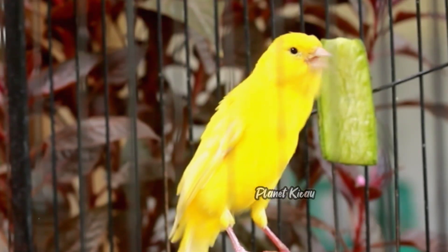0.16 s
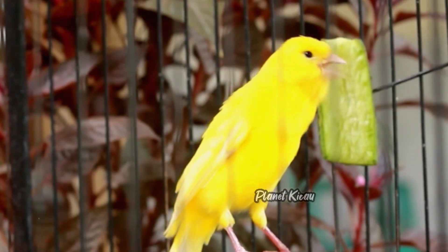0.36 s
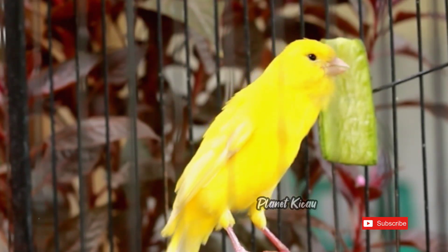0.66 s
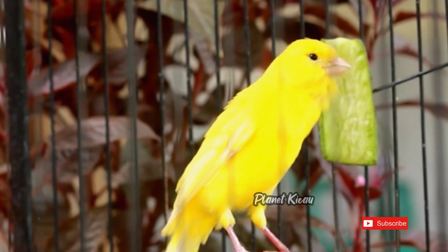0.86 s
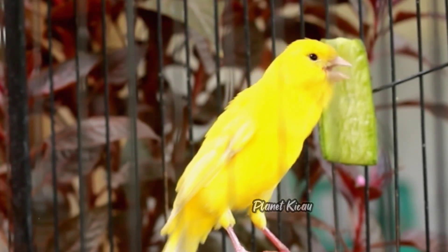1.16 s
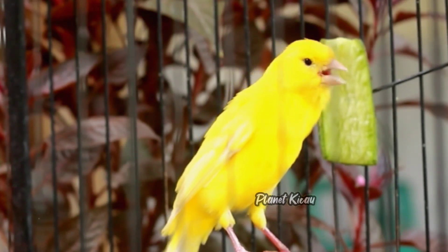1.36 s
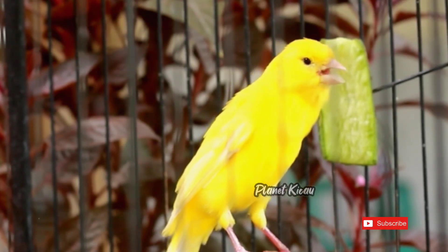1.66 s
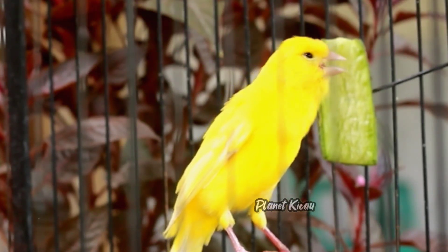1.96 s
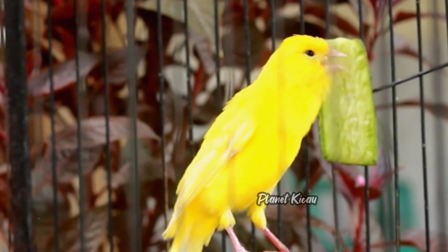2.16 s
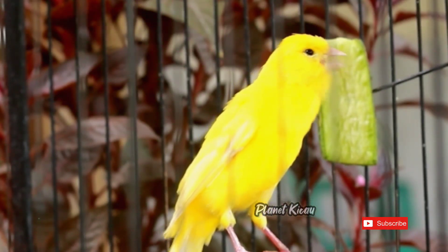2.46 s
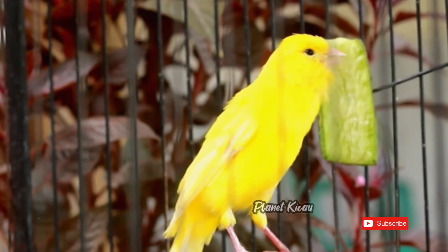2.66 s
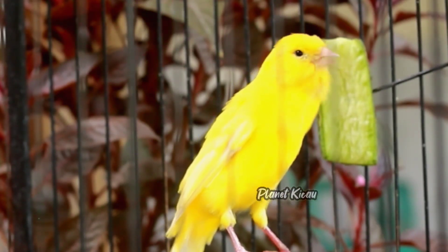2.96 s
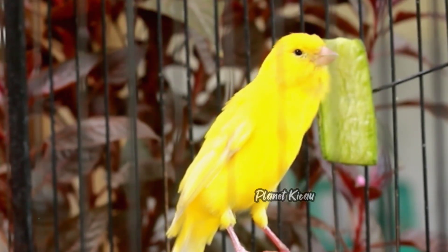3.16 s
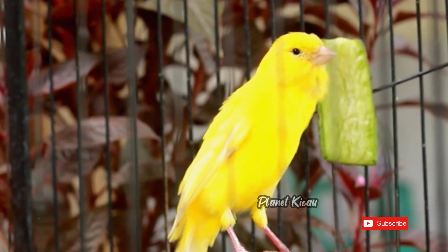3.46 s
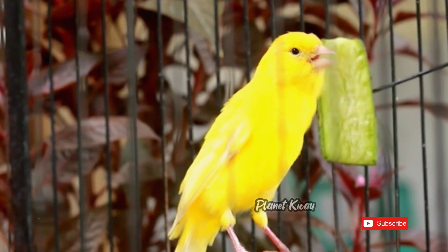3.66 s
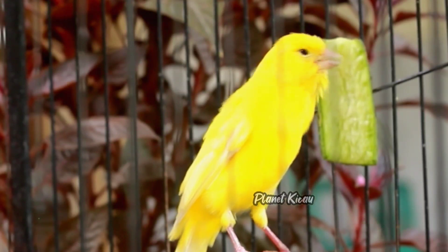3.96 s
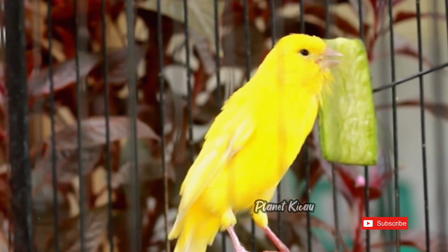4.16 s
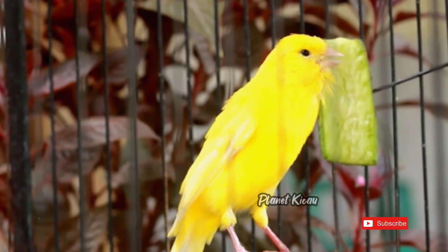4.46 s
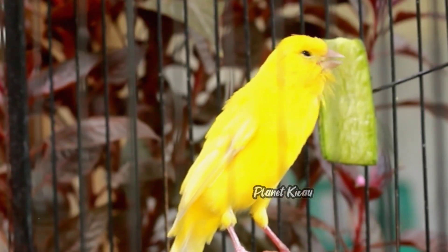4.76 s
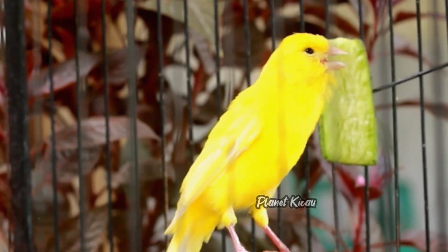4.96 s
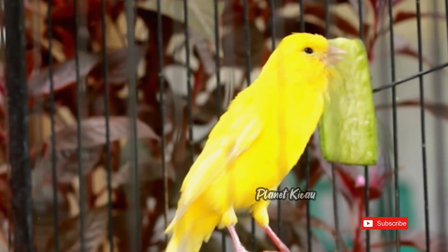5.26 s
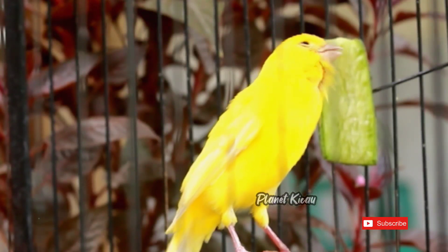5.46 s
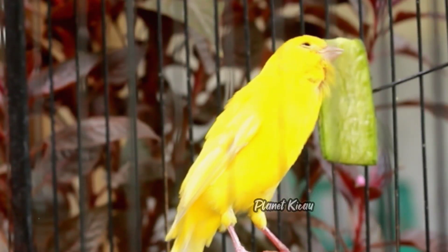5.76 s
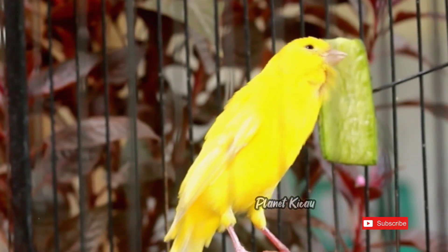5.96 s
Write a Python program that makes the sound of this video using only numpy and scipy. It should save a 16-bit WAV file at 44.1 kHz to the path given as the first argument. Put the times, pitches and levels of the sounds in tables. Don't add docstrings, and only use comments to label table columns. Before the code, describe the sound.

A single canary sings close to the microphone in a small room. A steady trill of sharp falling chirps, about nine or ten per second, runs nearly four seconds. Two sliding bridge notes follow, with a barely audible wooden perch tap, then four long whistles dropping and levelling out, and three more that keep falling. Low house hum sits quietly underneath, with short reflections and light reverberation.

```python
import sys
import numpy as np
from scipy import signal
from scipy.fft import rfft, irfft, next_fast_len
from scipy.io import wavfile
from scipy.ndimage import uniform_filter1d, map_coordinates

SR = 44100
rng = np.random.default_rng(int(sys.argv[2]) if len(sys.argv) > 2 else 0)


def field_ratio(decibels):
    return 10 ** (np.asarray(decibels, dtype=float) / 20)


def persist_wave(psi):
    counts = np.round(np.clip(psi, -1, 1) * 32767).astype(np.int16)
    wavfile.write(sys.argv[1], SR, np.atleast_2d(counts).T)


N = 269010

STATIONS_HZ = [6400, 5700, 5000, 4200, 3500, 3000, 2500, 1850, 1600]
# t/s of start, t/ms until 3.5 kHz, until 3 kHz, until 2.5 kHz, low-part level/dB
OPENING = [
    (-0.017, 39, 44.6, 47.2, -23.8),
    (0.07, 44.6, 52.4, 57.7, -25),
    (0.166, 35.6, 44.05, 46.6, -23),
    (0.269, 40.1, 45.5, 48.9, -23.5),
    (0.372, 41.7, 45.6, 50, -24.5),
    (0.481, 42.7, 51.5, 53.5, -23),
    (0.58, 39.8, 45.5, 48.4, -23.5),
    (0.686, 39.2, 42.9, 47.4, -25.5),
    (0.793, 39.36, 46.1, 49.6, -24),
    (0.894, 44.8, 51.1, 54.3, -21),
]
# t/s of start, t/ms until 3.5 kHz, until 3 kHz, until 2.5 kHz, low-part level/dB
DRAWN = [
    (1.004, 41.3, 45.3, 54, -20),
    (1.113, 51.3, 56.9, 62.5, -18),
    (1.219, 44.6, 51.1, 55.7, -15),
    (1.328, 54.6, 59.4, 62.1, -15),
    (1.438, 45.4, 49.8, 53.3, -17),
    (1.547, 57.4, 60, 62.3, -18.5),
    (1.655, 43.6, 47.7, 51.3, -15.5),
]
# t/s of start, t/ms until 3.5 kHz, until 3 kHz, until 2.5 kHz, low-part level/dB
QUICK = [(1.77, 29.3, 35.4, 42.9, -20), (1.874, 27.4, 39.8, 46.3, -20.5), (1.963, 27.2, 30.7, 44.5, -21),
         (2.067, 26.8, 30.7, 44.3, -19), (2.158, 28.5, 35.8, 42.85, -23.5), (2.255, 26.2, 30, 42.84, -21),
         (2.355, 26.1, 34.9, 42, -23.5), (2.452, 25.1, 35.1, 42.4, -19.5),
         (2.546, 28.9, 42.9, 46.34, -21.5), (2.652, 22.3, 30.1, 37.6, -23.5),
         (2.737, 24.7, 36.1, 40.2, -24.5), (2.832, 25.2, 32, 42.48, -26.5), (2.933, 27.7, 34.2, 44.65, -23),
         (3.024, 26.8, 30.3, 42.65, -24), (3.116, 30.2, 36.7, 45.8, -24), (3.225, 26.5, 31.2, 45.8, -23),
         (3.317, 27.7, 32.9, 37.95, -23), (3.414, 31.2, 40.7, 43.73, -25), (3.514, 33.7, 37.3, 47.4, -22.5),
         (3.607, 26.3, 31.8, 44.6, -22), (3.709, 27.8, 35.3, 43.8, -22)]
TIRES_AT = 9
# f/Hz at the top, t/ms of the last drop to 1.85 kHz
MANNER = [
    (7320, 2.6),
    (7060, 4.8),
    (7013, 3.6),
    (6978, 2.9),
]
PACE = [(.22, 0.45, .61, .71), (0.261, 0.51, .62, .76), (.27, .47, .64, 0.81), (.25, .44, .62, .75)]
# level/dB at the top, at 6.4, 5.7, 5 and 4.2 kHz
HIGH_DB = [(-21, -17, -12.5, -10, -14), (-16.5, -18.5, -13.5, -10.5, -28.5), (-19, -15, -25, -16, -7.5),
           (-22, -18.5, -22.5, -16.5, -8)]
# level/dB at 3.5, 3, 2.5, 1.85 and 1.6 kHz
LOW_DB = [(-17.5, 4.7, 7.5, 7, 4), (-2.5, 0.33, 0, -3.5, -4), (-1, 0.27, -0.5, 3, -0.5),
          (2.8, .3, 0.85, 7.5, 1)]
UNEVEN_DB, SHUT_MS = 2, 1.4
# t/s, f/Hz, level/dB
BRIDGE = [
    [(3.821, 6920, -26), (3.837, 5970, -19.5), (3.868, 5340, -22), (3.88, 4180, -18), (3.897, 3584, -20.5),
     (3.909, 3348, -10), (3.953, 3274, -27)],
    [(3.999, 7590, -21.5), (4.026, 7020, -8), (4.079, 5320, -10.5), (4.096, 4790, -15.5), (4.127, 3964, -8),
     (4.134, 3608, -13.5), (4.158, 3280, -13), (4.207, 2813, -10), (4.256, 2692, -24.5)],
]
# t/s of start, middle, break and end, f/Hz at the start
WHISTLES = [
    (4.3275, 4.376, 4.431, 4.543, 6300),
    (4.601, 4.662, 4.720, 4.832, 5728),
    (4.89, 4.945, 4.995, 5.113, 4773),
    (5.18, 5.229, 5.28, 5.402, 7380),
]
# stage (0 top, 1 middle, 2 break, 3 end), f/Hz, level/dB
WHISTLE = [
    (0, 7153, -24),
    (.27, 6744, -19.5),
    (.64, 5815, -6.5),
    (1.001, 4984, -15.5),
    (1.96, 3920, -9),
    (2.01, 3638, -10.5),
    (2.66, 2767, -11.5),
    (2.849, 2650, -17),
    (2.999, 2760, -20.5),
]
# t/s of start, middle, break and end, f/Hz at the start
SLIDES = [
    (5.443, 5.496, 5.531, 5.622, 5123),
    (5.672, 5.729, 5.754, 5.85, 4687),
    (5.9, 5.948, 5.98, 6.076, 4715),
]
# stage (as above), f/Hz, level/dB
SLIDE = [
    (0, 6950, -30),
    (0.361, 6380, -3.5),
    (1.002, 5130, -15),
    (1.41, 4500, -19),
    (2, 3523, -16.5),
    (2.41, 2960, -14),
    (2.799, 2272, -16.5),
    (3, 2032, -29.5),
]
# level/dB at its start, at its peak
FLICK_DB = [(-24, -11.5), (-18.5, -3.5)]
FLICK_PEAK = (.55, .85)
FLICK_HZ_PER_MS = 133
# f/Hz, level/dB
COLOUR = [(1500, -12), (2100, -12), (2600, 2), (2950, -2), (3300, 5.5), (3550, -0.5), (3770, -20.5),
          (4020, -8.5), (4200, -16.5), (4900, -3), (5500, -10), (6250, -22.5), (6550, -27), (7150, -9),
          (7700, -13.5), (8300, -20), (9000, -21.5), (9700, -3.5), (11000, -7), (12000, -6.5), (14000, 2.5),
          (15500, -6), (16800, -53)]
OVERTONES_DB = [-1, -22.5, -25.5, -28, -52.5, -39, -54]
MIRRORS_DB = [-19, -36, -39]
FOLD_HZ = 22050
# f/Hz, level/dB
HISS = [(1000, -88), (2000, -8), (6000, 4), (8000, -8.5), (10000, -15), (15000, -19)]
# t/ms, level/dB
ECHOES = [(1.5, -31.5), (4.3, -16.5), (9, -22.5)]
# f/Hz, t/s
ROOM = [(1500, 0.43), (3000, 0.33), (5000, 0.3), (8000, 0.019), (14000, 0.033)]
# f/Hz, level/dB per Hz
FLOOR = [(15, -27), (30, 6), (50, 12), (80, 12), (160, 10), (300, 4), (600, -3.5), (1100, -6), (2000, -5.5),
         (7000, -8), (16000, -13)]
FLOOR_DB = -64
# t/s, t/ms repeated
STEPS_BACK = [(0.1728, 11.6), (0.2268, 7.9), (0.2777, 7.8), (0.3225, 11.0), (0.3819, 12.5), (0.5424, 10.7),
              (0.5912, 10.4), (0.6475, 11.5), (0.7189, 11.5), (0.8503, 12.5), (0.9357, 5.4), (0.9626, 8.3),
              (1.0143, 10.3), (1.2245, 8.4), (1.4569, 5.6), (1.494, 8.8), (1.5729, 5.5), (1.6707, 12.4),
              (1.7894, 7.6), (1.8287, 6.2), (1.9211, 8.5), (1.9725, 11.1), (2.1149, 12.2), (2.1705, 9.0),
               (2.2206, 11.1), (2.2768, 11.5), (2.3781, 12.4), (2.4825, 12.1), (2.5772, 10.3),
               (2.6947, 10.3), (2.7437, 11.5), (2.863, 8.0), (2.9838, 11.7), (3.0435, 8.7), (3.1245, 10.2),
               (3.1709, 6.7), (3.3281, 9.1), (3.3757, 10.8), (3.4346, 12.1), (3.6126, 9.3), (3.7293, 8.9),
               (3.7688, 8.8),
              (3.8546, 7.8), (3.9408, 7.4), (4.2415, 10.8), (4.4034, 7.1), (4.4935, 5.6), (4.5283, 4.9),
              (4.6445, 6.3), (4.7136, 6.3), (4.7933, 12.5), (4.9147, 10.7), (5.0305, 4.7), (5.0827, 11.9),
              (5.3473, 7.1), (5.3758, 8.0), (5.4471, 7.0), (5.4807, 10.2), (5.5658, 8.1), (5.6083, 11.4),
              (5.6922, 12.2), (5.7939, 7.8), (5.8375, 11.0), (5.9335, 11.5), (6.0261, 9.9), (6.078, 5.3)]
STEPS = STEPS_BACK
OUT_OF_STEP = [4.2195, 5.5658, 5.7939, 6.0261]
LEAD = .2
TOP_HZ = 15750


def canary():
    pitch, effort = score()
    glide = np.clip(np.abs(np.gradient(np.log(pitch))) * SR, 3, 60)
    pitch = pitch * (1 + 0.0004 * np.sqrt(glide) * wobble(330))
    effort = effort * field_ratio(-.07 * glide * np.abs(wobble(260)))

    phase = 2 * np.pi * np.cumsum(pitch) / SR
    fold = 2 * np.pi * FOLD_HZ * np.arange(N) / SR
    colour = COLOUR
    flicker_db = 5.5
    drive_db = 0.29 * along(colour, pitch) + 5 * np.log10(glide / 8)

    voice, images = np.zeros(N), np.zeros(N)
    for k, db in enumerate(OVERTONES_DB, 1):
        level = db + along(colour, k * pitch)
        unsteady_db = drive_db + flicker_db * wobble(120)
        level = level + (k > 1) * unsteady_db
        voice += field_ratio(level) * np.sin(k * phase)
    for k, db in enumerate(MIRRORS_DB, 1):
        level = db + along(colour, k * pitch) + drive_db + flicker_db * wobble(120)
        images += field_ratio(level) * np.sin(fold - k * phase)

    hiss_db = -52.5 + .5 * along(colour, pitch) + 9.0 * np.log10(glide) + 2.3 * wobble(160)
    hiss = field_ratio(hiss_db) * noise(HISS)
    direct = effort * (voice + images + hiss)
    all_round = direct * field_ratio(-.3 * along(colour, pitch))
    return direct, all_round


def score():
    rows = []
    phrases = (OPENING, DRAWN, QUICK[:TIRES_AT], QUICK[TIRES_AT:])
    for phrase, *how in zip(phrases, MANNER, PACE, HIGH_DB, LOW_DB):
        rows += [syllable(row, *how) for row in phrase]
    for points in BRIDGE:
        rows.append(np.array([(sung_time(s), hz, db) for s, hz, db in points]))
    for kind, shape, flick_db in zip((WHISTLES, SLIDES), (WHISTLE, SLIDE), FLICK_DB):
        rows += [note(row, shape, flick_db) for row in kind]

    t, effort = np.arange(N) / SR, np.zeros(N)
    for row in rows:
        s, _, db = row.T
        s = np.maximum.accumulate(np.insert(s, -1, s[-1] - .006))
        db = np.insert(db, -1, 0.19 * db[-2] + 0.68 * db[-1])
        span = slice(round(s[0] * SR), round(s[-1] * SR))
        effort[span] = field_ratio(np.interp(t[span], s, db))
    s, hz, _ = np.concatenate(rows).T
    pitch = np.exp(np.interp(t, s, np.log(hz)))
    effort = uniform_filter1d(uniform_filter1d(effort, size=95), size=95)
    return uniform_filter1d(pitch, size=60), effort


def syllable(row, manner, pace, high_db, low_db):
    s, upper, middle, lower, db = row
    top_hz, drop = manner
    ms = [0, *(upper * np.array(pace)), upper, middle, lower, lower + drop, lower + drop + SHUT_MS]
    level = np.r_[high_db, db + np.array(low_db)] + UNEVEN_DB * rng.standard_normal(len(ms))
    when = sung_time(s) + np.maximum.accumulate(ms) / 1000
    return np.c_[when, [top_hz, *STATIONS_HZ], level]


def note(row, shape, flick_db):
    *times, start_hz = row
    stage, hz, db = np.transpose(shape)
    start, *later = map(sung_time, times)
    hz = np.r_[max(hz[0], start_hz), hz[1:]]
    climb_hz = hz[0] - start_hz
    rise = climb_hz / FLICK_HZ_PER_MS / 1000
    when, height = np.transpose([(0, 0), FLICK_PEAK])
    fall = np.interp(stage, range(4), [start + rise, *later])
    pitch = np.r_[start_hz + climb_hz * height, hz]
    return np.c_[np.r_[start + rise * when, fall], pitch, np.r_[flick_db, db]]


def sung_time(s):
    at, ms = np.transpose(STEPS)
    return LEAD + s - ms[at < s].sum() / 1000


def near_echoes(bird):
    return sum(field_ratio(db) * np.roll(bird, round(ms * SR / 1000)) for ms, db in ECHOES)


def room(x, piece=8192):
    wet, fade = np.zeros(N + SR), np.hanning(2 * piece)
    for a in range(0, N - 2 * piece, piece):
        hz, t, z = signal.stft(rng.standard_normal(SR // 2), SR, nperseg=256)
        decay = field_ratio(-60 * t / along(ROOM, hz)[:, None])
        tail = signal.istft(z * decay, SR, nperseg=256)[1]
        answer = signal.fftconvolve(fade * x[a:a + 2 * piece], tail / np.linalg.norm(tail))
        wet[a + 150:][:len(answer)] += answer
    return wet[:N]


def perch_knock():
    t = np.arange(N) / SR - sung_time(4.105)
    modes = np.sin(2 * np.pi * 880 * t) + np.sin(2 * np.pi * 1120 * t)
    return field_ratio(-58 - 60 * np.abs(t) / 0.03) * modes * (t > 0)


def house_hum():
    return field_ratio(FLOOR_DB + 0.62 * wobble(3.16)) * noise(FLOOR)


def along(points, hz):
    f, v = np.transpose(points)
    return np.interp(np.log(np.abs(hz) + 1), np.log(f + 1), v)


def noise(points):
    m = next_fast_len(N + 8192)
    white = rfft(rng.standard_normal(m))
    gain = field_ratio(along(points, np.fft.rfftfreq(m, 1 / SR)))
    x = irfft(white * gain, m)[:N]
    return x / x.std()


def wobble(rate):
    knots = rng.standard_normal(int(N * rate / SR) + 4)
    return map_coordinates(knots, [np.arange(N) * rate / SR])


def scene():
    bird, all_round = canary()
    hum = house_hum()
    wet = field_ratio(-18.5) * room(all_round)
    return (bird + near_echoes(bird) + wet + hum + perch_knock())[None]


def slowed(song, blend=150, search=9):
    out, back, start = np.zeros(N + blend), -round(LEAD * SR), 0
    ramp = np.linspace(0, 1, blend)
    extra = [(OUT_OF_STEP[0], .3), (N / SR, 0)]
    for s, ms in sorted([*map(tuple, STEPS), *extra]):
        stop = round(s * SR)
        piece = song[start - back:stop - back + blend].copy()
        piece[:blend] *= ramp
        piece[-blend:] *= 1 - ramp
        out[start:stop + blend] += piece
        here = song[stop - back:][:blend]
        lags = round(ms * SR / 1000) + np.arange(-search, search + 1)
        match = [here @ song[stop - back - lag:][:blend] for lag in lags]
        best = np.argmin(match) if s in OUT_OF_STEP else np.argmax(match)
        back += lags[best]
        start = stop
    return out[:N]


def top_cut(x):
    return signal.sosfilt(signal.butter(12, 16470, fs=SR, output="sos"), x)


def record(dry):
    edge = signal.firwin(401, TOP_HZ, fs=SR)
    mix = signal.fftconvolve(slowed(dry[0]), edge, "same")[None]
    return top_cut(mix)


dry = scene()
out = record(dry)
persist_wave(out)
```